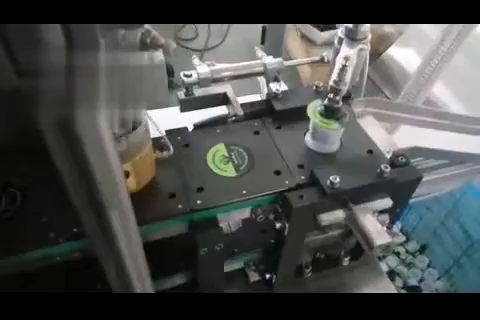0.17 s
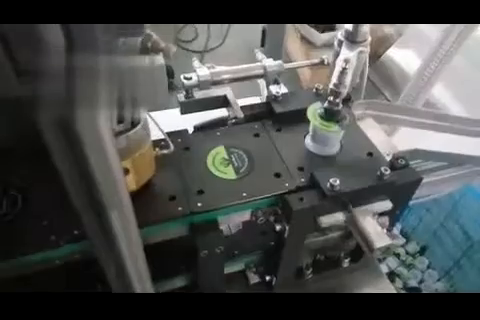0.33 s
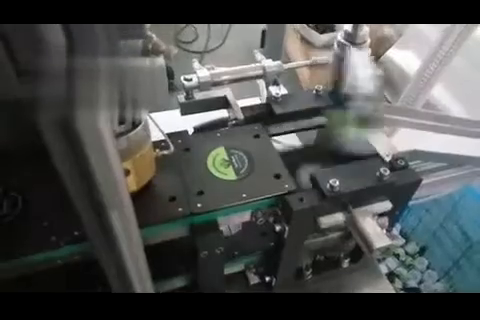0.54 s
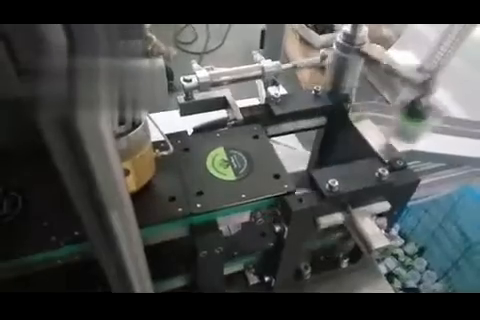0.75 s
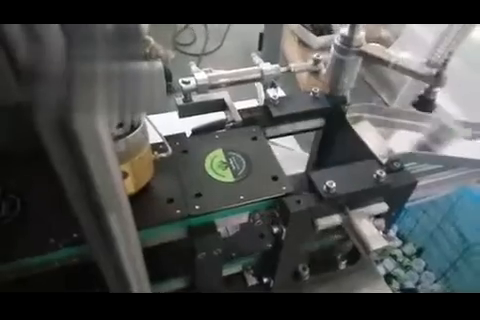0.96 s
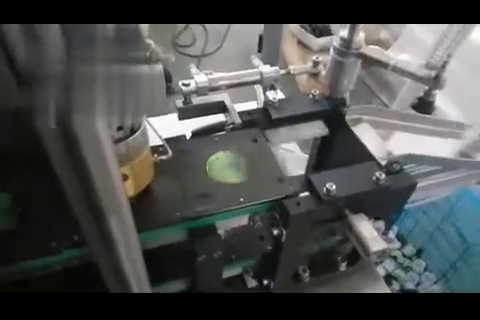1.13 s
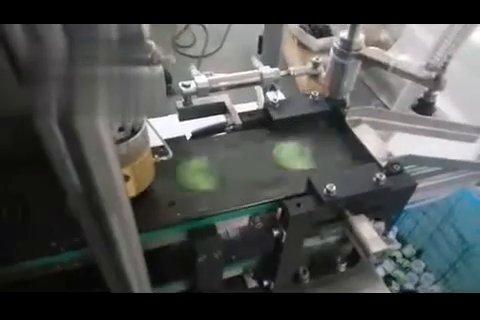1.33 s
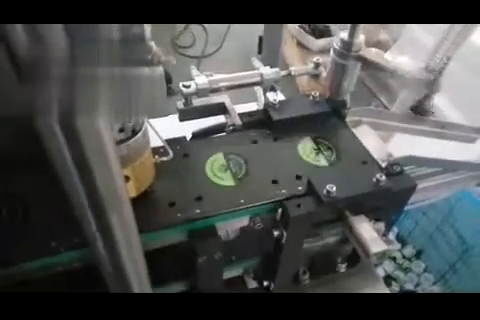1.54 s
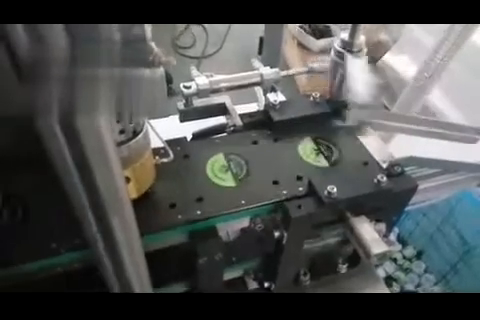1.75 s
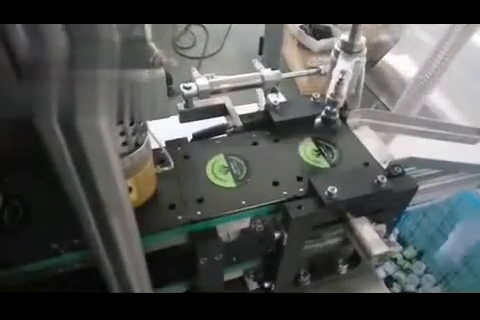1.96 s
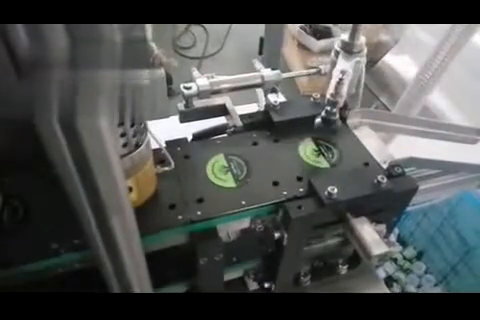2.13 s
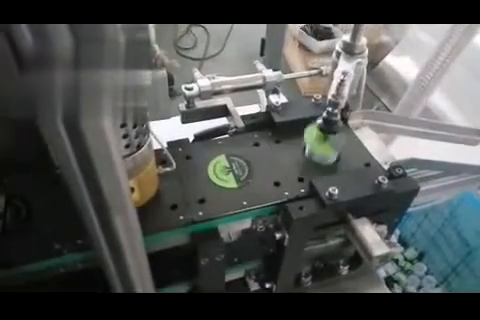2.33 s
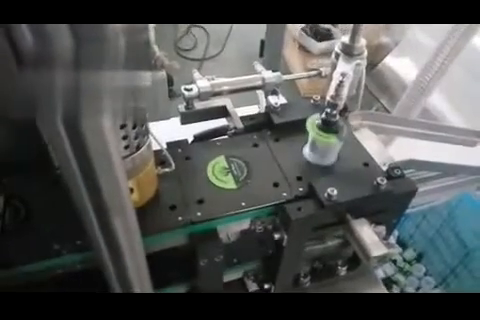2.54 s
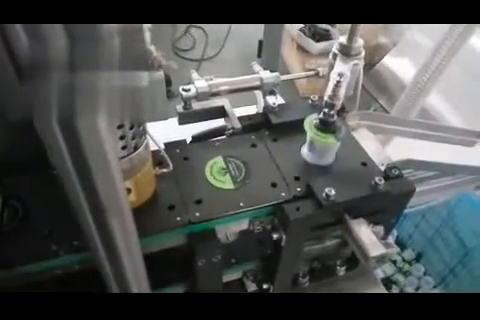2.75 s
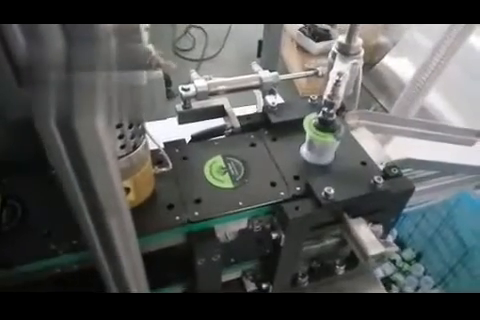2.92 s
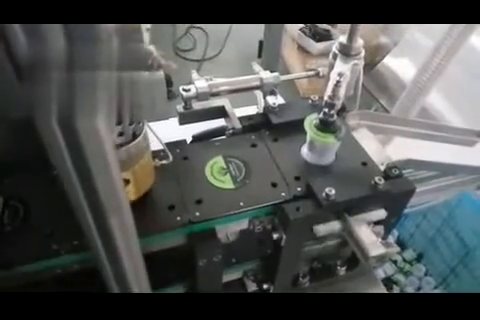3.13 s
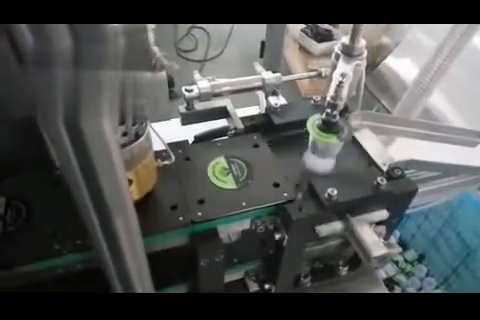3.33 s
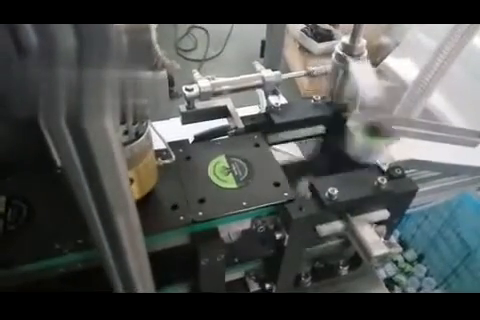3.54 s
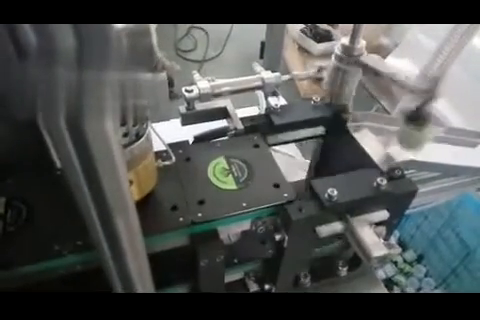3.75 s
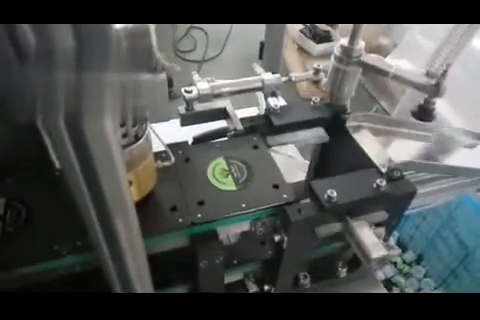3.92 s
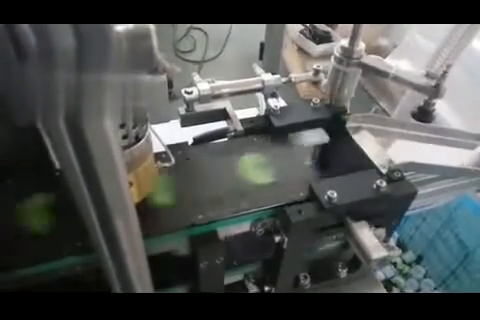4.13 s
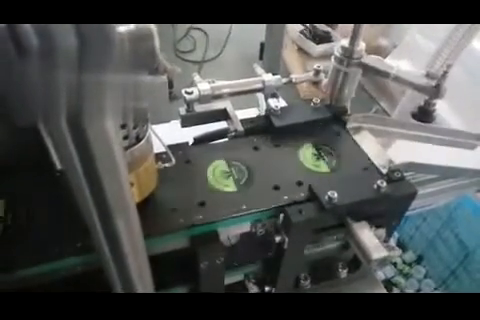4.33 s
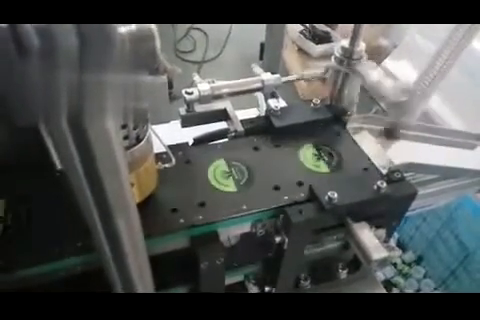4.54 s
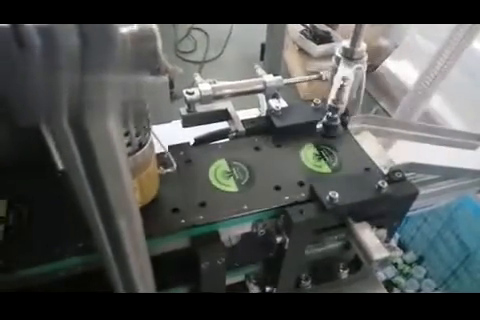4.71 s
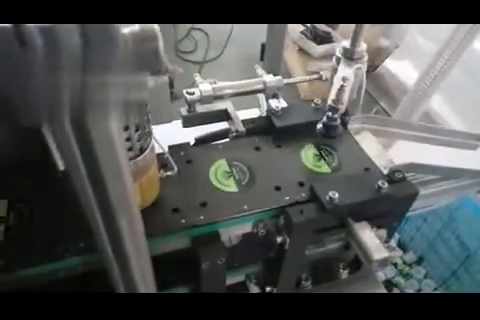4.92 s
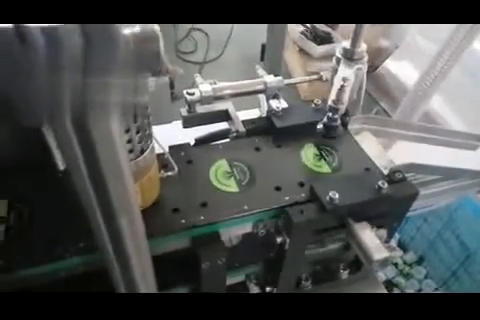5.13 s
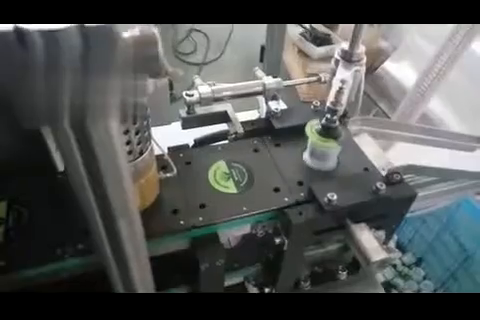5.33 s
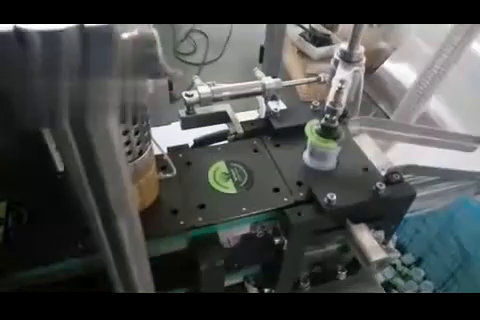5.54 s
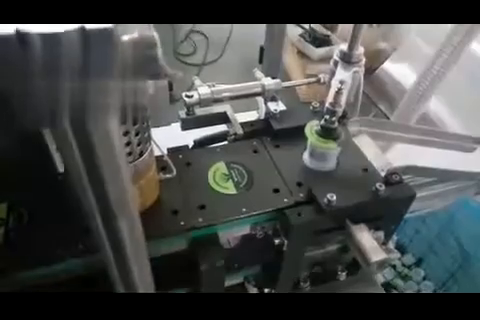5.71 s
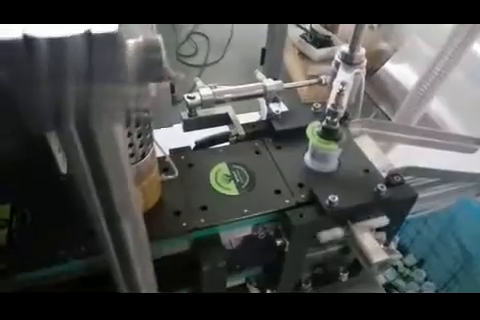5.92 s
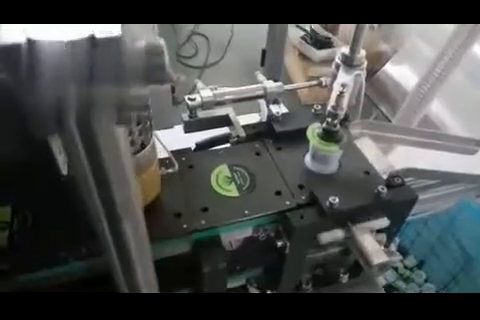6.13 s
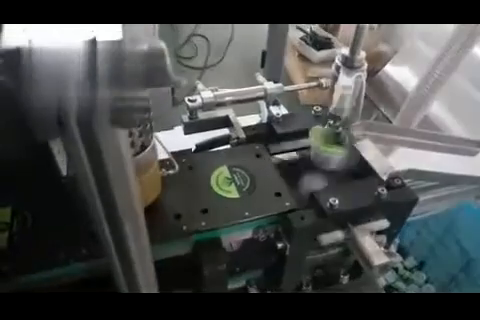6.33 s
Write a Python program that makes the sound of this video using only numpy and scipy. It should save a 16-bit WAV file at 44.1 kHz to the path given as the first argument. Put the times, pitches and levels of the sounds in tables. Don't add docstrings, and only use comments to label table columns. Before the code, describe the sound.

Pneumatic arms clack and ring against their stops, a carriage jolts, valves spit air and loose parts rattle above a droning factory background.

```python
import sys
import numpy as np
from scipy import signal
from scipy.io import wavfile
from scipy.ndimage import uniform_filter1d, minimum_filter1d

SR = 44100
rng = np.random.default_rng(int(sys.argv[2]) if len(sys.argv) > 2 else 0)


def volts(x):
    e = np.asarray(x, float) / 20
    return 10 ** e


def dump(signal):
    limited = np.clip(np.atleast_2d(signal).T, -1, 1)
    pcm = np.round(limited * 32767).astype(np.int16)
    wavfile.write(sys.argv[1], SR, pcm)


N = 285327
CYCLE_S, CUTOFF_HZ = 2.911, 8000

# pitch_hz [Hz], level_db [dB], t60_s [s]
FRAME_MODES = [(2374, 0, .2), (2445, -4, .12), (3572, -2, .2), (3603, -3, .2), (2760, -6, .08),
               (4795, -10, .12), (5940, -14, .08), (3200, -9, .08), (4250, -11, .08)]
ARM_RINGS = {"latch": [(0, 3670, -17.5), (.027, 2375, -35.5), (.027, 3510, -23)], "clamp": [(0, 2587, -3.5),
             (0, 3550, -28.5)], "rebound": [(0, 2369, -10), (0, 4330, -15)], "lift": [(0, 2750, -16),
             (0, 3805, -15.5), (0, 3350, -27.5), (.003, 3700, -22.5), (.003, 4540, -25.5),
             (0.0034, 2750, -12.5)], "swing": [(0, 2750, -16), (0, 4440, -18), (0, 5340, -23),
             (0, 6850, -16.5), (.017, 2340, -21.5)], "stop": [(0, 2448, -6.5), (0, 3560, -4)],
             "drop": [(0, 2632, -17), (0, 7020, -20)]}
STATION_RINGS = {"carriage": [(0, 2360, -4.5), (0, 3770, -12.5), (.011, 2360, -7.5), (.051, 2510, -10),
                 (.091, 2480, -28.5)], "brake": [(0, 3760, -22), (0, 2450, -22)], "catch": [(0, 2480, -15),
                 (0, 3670, -28.5)], "press": [(-.035, 2370, -24), (0, 2543, -9.5), (0, 3790, -8),
                 (.0315, 2450, -18), (.0315, 3500, -12.5)], "seal": [(0, 2657, -8.5), (0, 3080, -14.5)],
                 "pusher": [(0, 2410, -11.5), (0, 4810, -24)], "gate": [(0, 2833, -17.5), (0, 4014, -23)],
                 "return": [(0, 2750, -8), (0, 5490, -29.5), (.043, 2580, -13)]}
STRAY_RINGS = {"stray": [(.0159, 3600, -12), (.3975, 2390, -12.5), (.398, 4000, -14.5), (6.2145, 4250, -13),
               (3.3075, 4300, -13), (5.932, 2200, -13), (3.019, 2200, -15), (1.7635, 3600, -15),
               (5.228, 2600, -21), (5.233, 3600, -24), (.7721, 2360, -23.5), (5.828, 4830, -25),
               (1.3508, 2307, -10.5), (1.8009, 2620, -6.5), (1.8009, 3520, -5), (2.1, 3150, -30),
               (2.0597, 2450, -22), (2.9, 2370, -22.5), (2.4813, 2290, -23), (3.1, 2600, -21),
               (2.6279, 3550, -8), (2.915, 4994, -8), (5.5388, 3500, -11.5), (.5517, 2700, -16.5),
               (.1864, 2620, -21), (4.2254, 2830, -17), (5, 3740, -24.5), (4.7686, 2520, -20),
               (4.9691, 2860, -22.5), (5.435, 5100, -21), (5.4595, 2390, -17.5), (5.4595, 3405, -16),
               (5.9985, 2360, -6), (6.004, 2400, -14)]}
ALL_RINGS = {**ARM_RINGS, **STATION_RINGS, **STRAY_RINGS}


def rms_one(x):
    return x / np.sqrt(np.mean(x ** 2) + 1e-20)


def peak_one(x):
    return x / np.mean(np.abs(x).max(axis=1))


def at_hz(points, hz):
    table_hz, value = np.array(points).T
    return np.interp(np.log(hz), np.log(table_hz), value)


def drift(rate_hz):
    r = np.exp(-80 * np.pi * rate_hz / SR)
    slow = signal.lfilter([1], [1, -2 * r, r * r], rng.standard_normal(N // 40 + 2002))[2000:]
    return np.interp(np.arange(N) / 40, np.arange(len(slow)), rms_one(slow))


def ring(force, hz, t60_s):
    r, w = volts(-60 / (t60_s * SR)), 2 * np.pi * hz / SR
    return signal.lfilter([0, np.sin(w)], [1, -2 * r * np.cos(w), r * r], force + 1e-18)


def blow(size, contact_s):
    t = np.arange(size) / SR
    return rng.standard_normal((2, size)) * (t / contact_s) * np.exp(-t / contact_s)


def two_ears(mid, side, hz):
    # pitch_hz [Hz], left-right likeness [-1 to 1]
    likeness = [(60, 0.99), (120, 0.97), (240, 1), (480, 0.84), (970, 0.19), (1950, -0.098), (3900, -0.12),
                (7830, 1)]
    # pitch_hz [Hz], left minus right [dB]
    balance = [(60, 3), (100, -1), (180, 1), (300, 0), (520, 1), (900, 1.5), (1540, -1), (2650, -3),
               (4560, 1), (7830, -1.5)]
    alike = np.clip(at_hz(likeness, hz), -1, 1)
    lean = volts(at_hz(balance, hz) / 2 * np.array([[1], [-1]]))
    return lean * (np.sqrt(1 + alike) * mid + np.sqrt(1 - alike) * side * [[1], [-1]]) / np.sqrt(2)


def banded_noise(spectrum, patchy_db):
    low_hz, top_hz = spectrum[0][0], min(spectrum[-1][0], 9000)
    edges = np.geomspace(low_hz, top_hz, int(2 * np.log2(top_hz / low_hz)) + 2)
    out, together, white = 0, drift(13.0), rng.standard_normal((2, 2, N))
    for k, (low, high) in enumerate(zip(edges, edges[1:])):
        band = signal.butter(2, [low, high], "band", fs=SR, output="sos")
        mid, side = signal.sosfilt(band, white[k % 2])
        hz = np.sqrt(low * high)
        level_db = at_hz(spectrum, hz) + patchy_db * (together + drift(7.0))
        out = out + volts(level_db) * two_ears(mid, side, hz)
    return rms_one(out)


def cycle_db(moves, idle_db):
    t, power = np.arange(N) / SR, volts(2 * idle_db)
    for start, rise, hold, db, fall in moves:
        since = (t - start) % CYCLE_S
        swell_db = -17 * np.clip(1 - since / rise, 0, 1)
        fall_db = -fall * np.maximum(since - rise - hold, 0)
        power = power + volts(2 * (db + swell_db + fall_db))
    return 10 * np.log10(power)


def played(parts):
    strokes = {"latch": [(.0054, -3), (2.9168, -2), (5.8272, 0.5)], "clamp": [(.1032, 3), (3.0116, 3.5),
               (5.9244, 3)], "rebound": [(.1321, -4), (3.0415, -0.5), (5.9474, 2)], "lift": [(.3985, 0.5),
               (3.3089, 0.5), (6.2158, 0)], "swing": [(.5367, -4.5), (3.4396, -3.5), (6.3515, -4)],
               "drop": [(.6205, -2), (3.5304, 0.5), (6.4368, -1)], "carriage": [(1.1024, -7.5),
               (4.0158, -2.5)], "brake": [(1.3944, 2.5), (4.3006, 8.5), ], "catch": [(1.4206, -2),
               (4.3335, -1)], "press": [(1.7584, 4), (4.6698, 0.5)], "seal": [(1.8831, -0.5),
               (4.7924, -7.5)], "pusher": [(2.3276, -11), (2.3466, 7), (2.3545, 5), (5.23, -19),
               (5.2437, -1), (5.273, -2)], "gate": [(2.6279, 2), (5.5388, 6.5)], "return": [(2.7287, -8),
               (5.6341, 0)], "stop": [(.8785, 4)], "stray": [(0.00063, -0.5)]}
    events = []
    for name, rows in parts.items():
        for delay, *rest in rows:
            events += [(s + delay, *rest[:-1], rest[-1] + db) for s, db in strokes[name]]
    return events


def hall_noise():
    # pitch_hz [Hz], density_db [dB per Hz]
    spectrum = [(15, -61), (25, -3), (54, -28.5), (131, 1), (263, -9), (378, -0.5), (555, -20), (740, -8.5),
                (1170, -21.5), (2400, -4), (3130, -15), (5570, -18.5), (7800, -23), (10100, -63),
                (17200, -120)]
    return volts(-27.5) * banded_noise(spectrum, patchy_db=0.9)


def pump(level_db):
    # multiple of the turning rate [count], level_db [dB rms]
    tones = [(7, -66), (8, -44), (12, -61.5), (13, -55), (14, -49), (15, -42.5), (17, -52.5), (18, -52.5),
             (19, -45.5), (22, -47), (23, -42.5), (24, -41), (25, -36.5), (26, -53.5), (27, -46),
             (30, -53.5), (34, -70), (41, -44.5), (42, -48.5), (46, -39), (47, -41.5), (48, -40), (49, -40),
             (51, -46), (52, -40.5), (54, -54.5), (63, -55), (66, -48), (72, -70.5), (84, -44)]
    turning_hz = 15.641
    turn, out = 2 * np.pi * turning_hz * np.arange(N) / SR, 0
    for (multiple, db), phase in zip(tones, rng.uniform(0, 2 * np.pi, len(tones))):
        angle = multiple * turn + phase
        out = out + volts(db + level_db) * two_ears(np.sin(angle), np.cos(angle), multiple * turning_hz)
    return np.sqrt(2) * out


def slide_rumble():
    # pitch_hz [Hz], density_db [dB per Hz]
    spectrum = [(24, -60.5), (40, -34), (134, 1.5), (284, -8), (384, 5), (436, -14.5), (786, -6),
                (1800, -13), (2340, -42), (3960, -120)]
    # start_s [s], rise_s [s], hold_s [s], level_db [dB], fall [dB per s]
    travels = [
        (.1, 0.0056, 0.0057, -15, 65),
        (.4, 0.14, 0.025, -22, 46),
        (1.1, 0.038, 0.0068, -11, 54),
        (1.26, 0.088, 0.0086, -21, 65.5),
        (1.43, 0.031, 0.092, -22, 82),
        (1.78, 0.094, 0.035, -20.5, 66.5),
        (2.05, 0.13, 0.041, -24.5, 55),
        (2.36, 0.019, 0.16, -23.5, 22.5),
        (2.63, 0.098, 0.011, -17.5, 116),
    ]
    return volts(cycle_db(travels, idle_db=-30.5) - 2.5) * banded_noise(spectrum, patchy_db=1.0)


def blasts(level_db):
    # pitch_hz [Hz], density_db [dB per Hz]
    spectrum = [(530, -24.5), (900, 5.5), (1380, -19), (1500, 0), (2260, 7), (3620, 5), (4950, -2.5),
                (7600, -10), (9880, -55.5), (16700, -120)]
    # start_s [s], rise_s [s], hold_s [s], level_db [dB], fall [dB per s]
    valves = [(0.0, 0.0006, 0.012, -30, 151), (.1, 0.002, 0.055, -19.5, 149.5),
              (.46, 0.083, 0.029, -24.5, 179), (1.1, 0.0015, 0.047, -25.5, 78), (1.1, 0.079, 0.17, -19, 75),
              (1.36, 0.0088, 0.0095, -22.5, 136.5), (1.757, 0.0037, 0.056, -19.5, 151),
              (1.883, 0.0033, 0.011, -22, 158), (1.95, 0.4, 0.061, -24.5, 194.5),
              (2.3, 0.046, 0.025, -23.5, 68), (2.4, 0.097, 0.24, -24, 168), (2.7, 0.04, 0.022, -23, 172.5)]
    # pitch_hz [Hz], width_hz [Hz], level_db [dB]
    nozzles = [(5100, 1900, -11), (5790, 130, -23), (2940, 1000, -14)]
    hiss = banded_noise(spectrum, patchy_db=1.1)
    for hz, width_hz, db in nozzles:
        band = signal.butter(2, [hz - width_hz / 2, hz + width_hz / 2], "band", fs=SR, output="sos")
        whistle = rms_one(signal.sosfilt(band, rng.standard_normal((2, N))))
        hiss = hiss + volts(db + 5.3 * drift(5.5)) * whistle
    return volts(cycle_db(valves, idle_db=-51.5) + level_db + 0.6 * drift(45.0)) * hiss


def vents(rise_s, fall_s):
    # start_s [s], length_s [s], pitch_hz [Hz], width_hz [Hz], level_db [dB]
    puffs = [(0.079, 0.027, 6000, 2210, -29), (0.507, 0.026, 6170, 2200, -23.5),
             (1.177, 0.12, 4970, 500, -18.5), (1.227, 0.02, 7500, 700, -24.5),
             (1.392, 0.052, 5940, 396, -23.5), (1.742, 0.11, 5770, 910, -22.5),
             (2.062, 0.034, 5450, 300, -32), (2.155, 0.036, 5420, 300, -36), (2.322, .03, 4940, 400, -23),
             (2.5, 0.049, 4960, 300, -27), (2.889, 0.015, 5650, 1490, -28.5),
             (3.004, .03, 5800, 2180, -20.5), (3.273, 0.049, 6370, 2400, -26.5),
             (3.404, 0.051, 6600, 2220, -26.5), (4.051, 0.027, 7070, 704, -22.5),
             (4.105, 0.1, 4720, 500, -18), (4.12, 0.032, 7460, 800, -19), (4.33, 0.023, 5600, 500, -34),
             (4.645, 0.064, 5400, 2200, -21), (5.38, 0.0295, 5420, 604, -23),
             (5.631, 0.051, 6050, 700, -22), (5.97, 0.035, 5970, 394, -25), (6.178, 0.036, 6200, 2000, -22),
             (6.304, 0.088, 6640, 1800, -33)]
    out, size = np.zeros((2, N + SR)), SR // 4
    t = np.arange(size) / SR
    for s, length, hz, width_hz, db in puffs:
        band = signal.butter(2, [hz - width_hz / 2, hz + width_hz / 2], "band", fs=SR, output="sos")
        shape = np.minimum(t / rise_s, 1) * np.exp(-np.maximum(t - length, 0) / fall_s)
        hiss = rms_one(signal.sosfilt(band, rng.standard_normal((2, size))))
        start = round(s * SR)
        out[:, start:start + size] += volts(db) * shape * hiss
    return out[:, :N]


def loose_rattle(level_db, taps_per_s, spread_db):
    # start_s [s], rise_s [s], hold_s [s], level_db [dB], fall [dB per s]
    shakes = [
        (0.0, 0.0034, 0.041, -16.5, 210),
        (.1, .004, 0.016, -10.5, 132.5),
        (.45, 0.15, 0.0093, -33, 95),
        (1.1, 0.02, 0.019, -12.5, 53),
        (1.3, 0.0087, 0.19, -16.5, 87),
        (1.758, 0.0019, 0.055, -7.5, 120),
        (1.883, .003, 0.018, -21.5, 91),
        (2.0, 0.025, 0.13, -25.5, 113),
        (2.33, 0.034, 0.099, -18.5, 28),
        (2.55, 0.11, 0.082, -19, 205),
    ]
    strength_db = spread_db * np.minimum(rng.exponential(1, (2, N)), 4)
    taps = (rng.random((2, N)) < taps_per_s / SR) * volts(strength_db)
    loose = 0
    for k, (hz, db, t60) in enumerate(FRAME_MODES):
        shifted = np.roll(taps, 9001 * k, axis=1)
        loose = loose + volts(db) * rms_one(ring(shifted, hz, 0.24 * t60))
    return volts(cycle_db(shakes, idle_db=-33) + level_db) * rms_one(loose)


def thuds():
    # start_s [s], body_db [dB], pitch_hz [Hz], t60_s [s], knock_db [dB]
    landings = [(0.548, -7.5, 298.3, 0.22, -25), (0.575, -15, 190, 0.064, -25),
                (2.749, -16.5, 876, 0.061, -11), (3.091, -14, 815, 0.07, -34),
                (3.244, -15.5, 320, 0.075, -14.5), (3.458, -6, 305, 0.045, -14),
                (5.097, -11, 149, 0.2, -12), (5.673, -17.5, 755, 0.048, -24),
                (5.999, -16.5, 896, 0.043, -4.5), (6.365, -8, 303.5, 0.13, -18),
                (6.384, -17, 344.5, 0.16, -13.5), (0.595, -12.5, 301, 0.063, -21),
                (2.2, -20, 197, 0.14, -22), (6.15, -17, 339, 0.087, -12.5), (5.8, -19.5, 293, 0.054, -27)]
    out, size = np.zeros((2, N + SR)), SR // 3
    dull = signal.butter(2, [180, 1150], "band", fs=SR, output="sos")
    for s, db, hz, t60, knock_db in landings:
        force = two_ears(*blow(size, contact_s=.013), 300)
        knock = two_ears(*blow(size, contact_s=.0035), 400)
        body = ring(force, hz, t60) + 0.35 * ring(force, 1.32 * hz, t60) + 0.38 * ring(force, .71 * hz, t60)
        start = round(s * SR)
        out[:, start:start + size] += volts(db + 1.0) * peak_one(body)
        out[:, start:start + size] += volts(knock_db) * peak_one(signal.sosfilt(dull, knock))
    return signal.sosfilt(signal.butter(2, 70, "high", fs=SR, output="sos"), out[:, :N])


def jolts():
    # start_s [s], then the level of each carriage mode in order [dB]
    hits = [
        (1.139, -8.5, -17, 2.5, -17, 1),
        (1.348, -20, -10.5, -0.5, -12, -7.5),
        (4.052, -6, -14, -3, -19, -2),
        (4.257, -16, -12, -1.5, -23, -15),
    ]
    # pitch_hz [Hz], t60_s [s]
    modes = [(240, 0.082), (400, 0.074), (580, 0.02), (780, .04), (1030, 0.04)]
    out = np.zeros(N)
    for k, (hz, t60) in enumerate(modes):
        clicks = np.zeros(N)
        clicks[[round(row[0] * SR) for row in hits]] = volts(np.array(hits)[:, k + 1])
        out += ring(clicks, hz, t60)
    return signal.sosfilt(signal.butter(2, 130, "high", fs=SR, output="sos"), uniform_filter1d(out, size=9))


def knocks():
    # start_s [s], peak_db [dB], pitch_hz [Hz]
    contacts = [(0.103, -5, 1385), (0.178, -6.5, 850), (0.398, -10, 960), (0.541, -23, 1800),
                (0.615, -19, 1420), (0.879, -9, 1460), (1.1, -6.5, 1730), (1.2899, -12, 2010),
                (1.3211, -9, 1080), (1.8678, -13.5, 1680), (1.887, -4, 1960), (2.588, -12.5, 1790),
                (2.628, -8, 1920), (2.7261, -7, 890), (3.015, -0.5, 1355), (3.46, -8, 1860),
                (4.0138, -7, 1710), (4.7854, -24, 1950), (5.385, -14.5, 1614), (5.434, -25, 931),
                (5.4818, -20, 920), (5.5407, -2.5, 980), (5.634, -3, 1003), (5.928, -6, 1345),
                (6.2161, -10, 940), (6.4417, -15, 1630)]
    out, size = np.zeros((2, N + SR)), SR // 10
    for s, db, hz in contacts:
        force = two_ears(*blow(size, contact_s=.0015), 600)
        start = round(s * SR)
        out[:, start:start + size] += volts(db - 3) * peak_one(ring(force, hz, t60_s=.035))
    return signal.sosfilt(signal.butter(2, 600, "high", fs=SR, output="sos"), out[:, :N])


def struck_frame(level_db, reach_hz):
    s, ring_hz, ring_db = np.transpose(played(ALL_RINGS))
    start, struck = (s * SR).astype(int) + 130, 0
    for hz, db, t60 in FRAME_MODES:
        clicks = np.zeros((2, N))
        near = volts(ring_db) * (abs(ring_hz - hz) < reach_hz)
        np.add.at(clicks[0], start, near)
        np.add.at(clicks[1], start + round(SR / hz / 4), near)
        struck = struck + volts(db + level_db) * ring(clicks, hz, t60)
    return struck


def sings(rough, lead):
    # start_s [s], pitch_hz [Hz], level_db [dB], hold_s [s], t60_s [s]
    notes_sung = [(.003, 3610, -7, 0.029, .08), (0.849, 2390, -22.5, .025, .05),
                  (1.104, 3560, -7, 0.029, .15), (1.099, 2385, -9, 0.033, .1), (1.151, 2365, -14, .04, .08),
                  (1.16, 3560, -22, .03, .1), (1.391, 2390, -19, .04, .1), (1.43, 3600, -21.5, 0.1, .2),
                  (1.789, 3580, -9.5, .028, .1), (2.364, 2345, -13.5, 0.027, 0.14),
                  (2.92, 3570, -12, 0.024, 0.2), (2.942, 2400, -20, 0.018, 0.16),
                  (4.017, 2360, -7.5, 0.051, 0.19), (4.019, 3545, -20, 0.043, .2),
                  (4.669, 3536, -5, 0.04, 0.22), (4.686, 2420, -11, .03, .15), (4.759, 3600, -16, .025, .1),
                  (4.849, 3600, -22, .04, 0.18), (4.36, 3620, -21.5, .12, .3),
                  (4.331, 2400, -20.5, 0.037, .3), (5.546, 2750, -17, .02, .1),
                  (5.236, 2407, -10, .018, .04), (5.265, 2379, -8, 0.015, 0.14),
                  (5.828, 3613, -11.5, .012, 0.26), (5.832, 2396, -23, 0.043, .15),
                  (0.404, 2705, -17, .018, .07), (6.227, 2640, -18, .012, 0.089)]
    rise_s, scoop, scoop_s, beat_hz, beat_depth = .004, 0.051, .007, 62.3, 0.38
    out, size = np.zeros((2, N + SR)), SR // 4
    t = np.arange(size) / SR
    beat = 1 + beat_depth * np.sin(2 * np.pi * beat_hz * t - np.pi / 2)
    bend = t - scoop * scoop_s * (1 - np.exp(-t / scoop_s))
    for s, hz, db, hold, t60 in notes_sung:
        shape = (1 - np.exp(-t / rise_s)) * volts(-60 * np.maximum(t - hold, 0) / t60)
        angle = 2 * np.pi * hz * bend + rough * np.cumsum(rng.standard_normal(size))
        start = round(s * SR)
        out[:, start:start + size] += volts(db) * shape * beat * np.sin(angle + np.array([[0], [lead]]))
    return out[:, :N]


def on_frame(hz, reach):
    modes_hz = np.array(FRAME_MODES)[:, 0]
    nearest = modes_hz[np.argmin(abs(modes_hz - hz))]
    return nearest if abs(nearest / hz - 1) < reach else hz


def crack(size, band, contact_s):
    force = blow(size, contact_s) * np.minimum(np.arange(size) / 100, 1)
    pitches_hz = 2400 * 2 ** rng.uniform(0, 1.15, 4)
    body = sum(ring(force, hz, t60_s=0.015) for hz in pitches_hz)
    return peak_one(peak_one(signal.sosfilt(band, force)) + volts(-7) * peak_one(body))


def clacks(crack_db, ring_db, rough, scoop, lead):
    cracks = {"latch": [(0.0026, -3.5)], "clamp": [(0, 5), (.08, -11)], "rebound": [(0.002, 1.5)],
              "lift": [(-.001, 6.5), (.004, 4), (.011, 4), (.018, -0.5)], "swing": [(0, 5), (.017, -5.5)],
              "drop": [(0.001, -7.5)], "carriage": [(-.003, 9), (.051, -2), (.091, 1.5)],
              "brake": [(0.0067, -3.5)], "catch": [(0.003, 5.5)], "press": [(0, 8.5), (.0315, 5.5)],
              "seal": [(0.0013, 8)], "pusher": [(0.0028, -14.5)], "gate": [(0.0039, 5)],
              "return": [(0, 10.5), (.043, -1.5)], "stop": [(.002, -17)], "stray": [(1.8009, 8),
              (1.9038, -11), (2.0597, -14), (2.4813, -1.5), (2.5805, -4), (4.2254, -13), (4.7686, -12),
              (5.3857, -15.5), (5.9694, 0)]}
    swells = {"latch": 0.0028, "clamp": .0014, "rebound": 0.0022, "lift": 0.0026, "swing": 0.0022, "drop":
              .002, "carriage": 0.003, "brake": 0.0041, "catch": 0.0016, "press": 0.0028, "seal": 0.0034,
              "pusher": .0017, "gate": 0.0029, "return": 0.0035, "stop": 0.0036, "stray": 0.0028}
    damping = 1.5
    out, size = np.zeros((2, N + SR)), SR // 12
    crack_band = signal.butter(2, [2100, 5000], "band", fs=SR, output="sos")
    t = np.arange(size) / SR
    for name, swell_s in swells.items():
        shape = ((t / swell_s / 2) ** 2 * np.exp(2 - t / swell_s)) ** damping
        bend = t - scoop * swell_s * (1 - np.exp(-t / swell_s))
        for s, db in played({name: cracks[name]}):
            start = round(s * SR) - 50
            out[:, start:start + size] += volts(db + crack_db) * crack(size, crack_band, 1.2 * swell_s)
        for s, hz, db in played({name: ALL_RINGS[name]}):
            wander = rough * np.cumsum(rng.standard_normal(size))
            angle = 2 * np.pi * on_frame(hz, reach=.04) * bend + wander
            start = round(s * SR) - 50
            out[:, start:start + size] += volts(db + ring_db) * shape * np.sin(angle + np.array([[0], [lead]]))
    return out[:, :N]


def hall_echo(x):
    t = np.arange(SR * 3 // 4) / SR
    tail = rng.standard_normal((2, len(t))) * volts(-60 * t / .2) * (t > .006)
    tail /= np.sqrt(np.sum(tail ** 2, axis=1, keepdims=True))
    return volts(-13) * signal.fftconvolve(x, tail, axes=1)[:, :N]


def ducking(near, above_db, share, smooth_s):
    size = round(smooth_s * SR)
    level_db = 10 * np.log10(uniform_filter1d(np.mean(near ** 2, axis=0), size=size) + 1e-12)
    return volts(-share * uniform_filter1d(np.maximum(level_db - above_db, 0), size=size))


def scene():
    behind = hall_noise() + pump(level_db=1.0) + slide_rumble()
    air = blasts(level_db=5.0) + vents(rise_s=0.005, fall_s=0.009)
    steel = loose_rattle(level_db=-4.5, taps_per_s=660.0, spread_db=4.5)
    steel = steel + struck_frame(level_db=-26, reach_hz=129)
    landings = thuds() + volts(2.0) * jolts() + knocks()
    hits = sings(rough=.055, lead=1.62)
    hits = hits + clacks(crack_db=-6.5, ring_db=7.0, rough=0.09, scoop=0.054, lead=1.36)
    behind = ducking(hits, above_db=-22, share=0.3, smooth_s=.03) * behind
    return behind + air + steel + landings + hits + hall_echo(hits)


def limiter(x, ceiling_db, release_db_per_s, attack_s):
    over = np.maximum(20 * np.log10(np.abs(x).max(axis=0) + 1e-9) - ceiling_db, 0)
    climb = release_db_per_s * np.arange(N) / SR
    held = np.maximum.accumulate(over + climb) - climb
    r = np.exp(-1 / (attack_s * SR))
    return x * volts(-signal.lfilter([1 - r], [1, -r], held))


def starve(x):
    # low_hz [Hz], high_hz [Hz], share of frames [0 to 1]
    gaps = [(4100, 4400, .02), (5200, 5600, .02), (5800, 6300, .06), (6300, 6900, .1), (6900, 7300, .18),
            (7300, 7900, .34)]
    mottle_db, mottle_from_hz, mottle_band_hz = 2, 1100, 260
    hz, _, z = signal.stft(x, SR, nperseg=2048)
    power = np.sum(abs(z) ** 2, axis=0)
    error = rng.standard_normal((100, power.shape[1]))[(hz // mottle_band_hz).astype(int)]
    z *= volts(mottle_db * error * (hz > mottle_from_hz)[:, None])
    for low, high, share in gaps:
        band = (hz >= low) & (hz < high)
        chance = volts(rng.normal(0, 5, power.shape[1]))
        weight = (power[band].sum(axis=0) / power.sum(axis=0)) ** .12 * chance
        z[:, band] *= np.where(weight < np.quantile(weight, share), .004, 1)
    return signal.istft(z, SR, nperseg=2048)[1][:, :N]


def thin_treble(x):
    # attack_s [s], gap_s [s], above_hz [Hz], loss_db [dB]
    moments = [
        (.396, .014, 2800, -11),
        (1.096, .028, 1700, -14),
    ]
    t = np.arange(N) / SR
    for s, gap, hz, db in moments:
        treble = signal.sosfiltfilt(signal.butter(4, hz, "high", fs=SR, output="sos"), x)
        gate = uniform_filter1d(1. * (t > s - gap) * (t < s), size=130)
        x = x - (1 - volts(db)) * gate * treble
    return x


def under_full_scale(x, top):
    gain = np.minimum(1, top / (np.abs(x).max(axis=0) + 1e-9))
    return x * uniform_filter1d(minimum_filter1d(gain, size=201), size=201)


def overloads():
    # start_s [s], length_s [s], level_db [dB], left minus right [dB]
    spits = [(0.113, 0.0011, -46, -23), (.119, .001, -54, -20), (0.4, .01, -36, -8), (.414, .007, -46, -6),
             (1.0984, .002, -58, 10), (1.7569, .001, -55, -24), (3.0116, .001, -54, -15),
             (3.528, .012, -61, 20), (5.899, 0.041, -58.5, -18), (5.9224, 0.0012, -36, -12),
             (6.4418, 0.0016, -54, 9)]
    t, gate = np.arange(N) / SR, np.zeros((2, N))
    for s, length, db, lean_db in spits:
        gate += volts(db + lean_db / 2 * np.array([[1], [-1]]) + 8.5) * ((t > s) & (t < s + length))
    spit = uniform_filter1d(gate, size=21) * rng.standard_normal((2, N))
    spit = signal.sosfilt(signal.butter(6, CUTOFF_HZ, "high", fs=SR, output="sos"), spit)
    spit = signal.sosfilt(signal.butter(5, 8600, fs=SR, output="sos"), spit)
    return signal.sosfilt(signal.cheby2(10, 50, 15000, fs=SR, output="sos"), spit)


def low_pass(x):
    return signal.sosfilt(signal.butter(12, 15000, fs=SR, output="sos"), x)


def record(dry):
    x = signal.sosfilt(signal.butter(2, 22, "high", fs=SR, output="sos"), dry)
    x = limiter(x, ceiling_db=1.5, release_db_per_s=140.0, attack_s=0.001)
    x = np.tanh(x / 1.4) * 1.25
    x = signal.sosfilt(signal.cheby2(20, 60, CUTOFF_HZ, fs=SR, output="sos"), x)
    x = under_full_scale(thin_treble(starve(x)), top=.92)
    x = signal.sosfiltfilt(signal.cheby2(12, 40, CUTOFF_HZ + 500, fs=SR, output="sos"), x)
    return low_pass(x + overloads())


dry = scene()
out = record(dry)
dump(out)
```